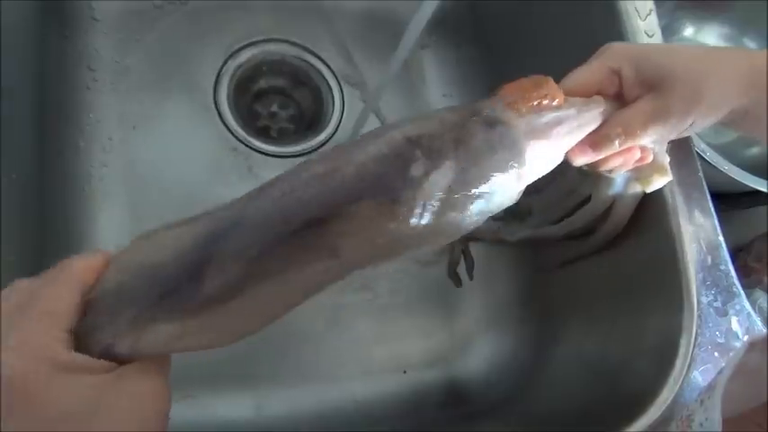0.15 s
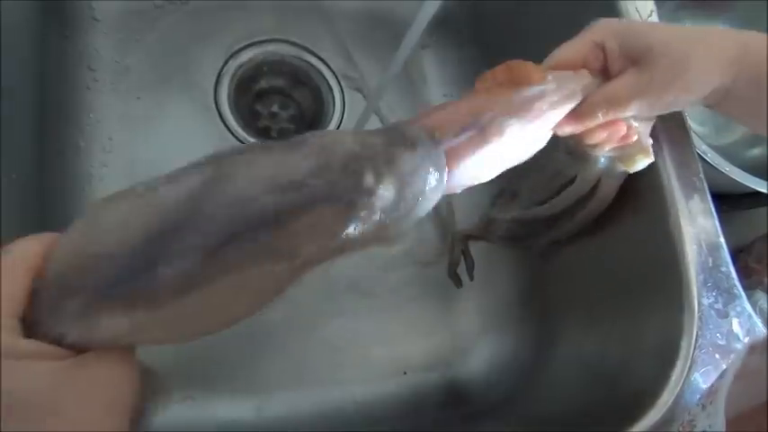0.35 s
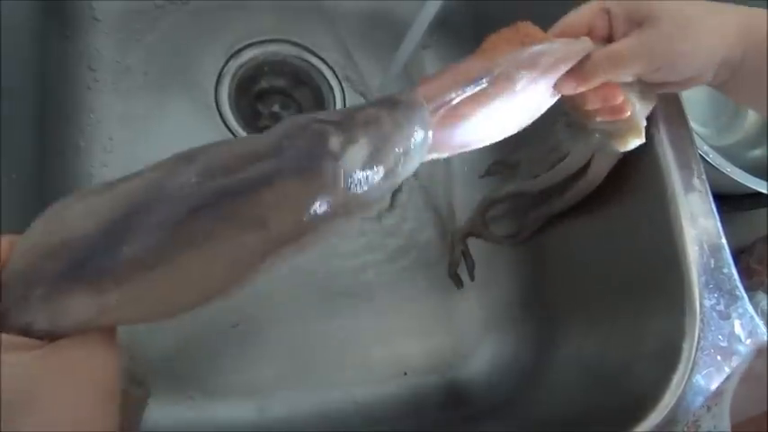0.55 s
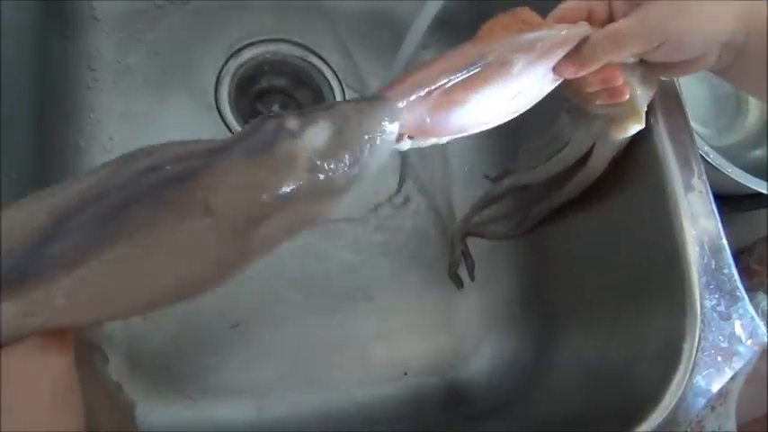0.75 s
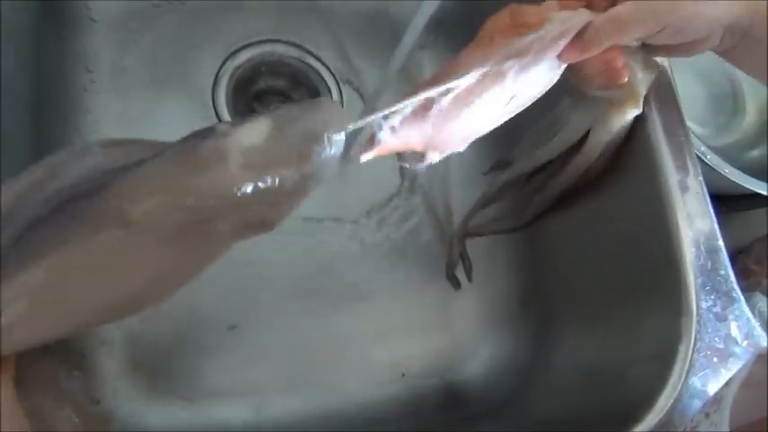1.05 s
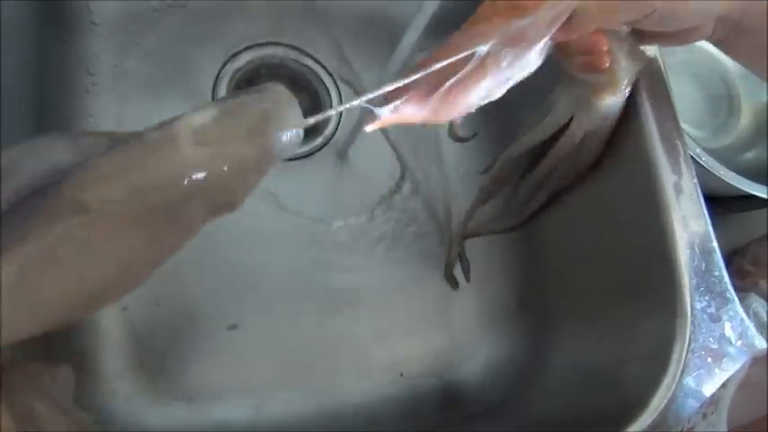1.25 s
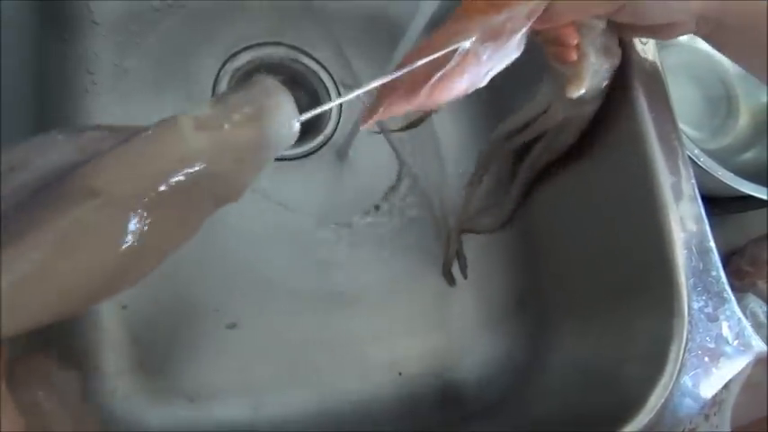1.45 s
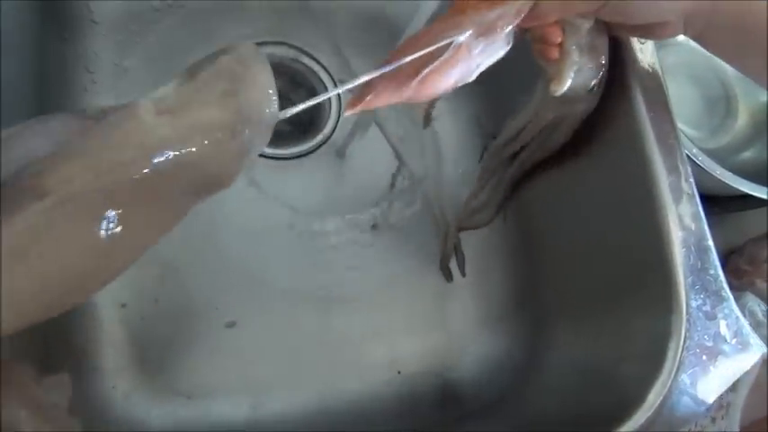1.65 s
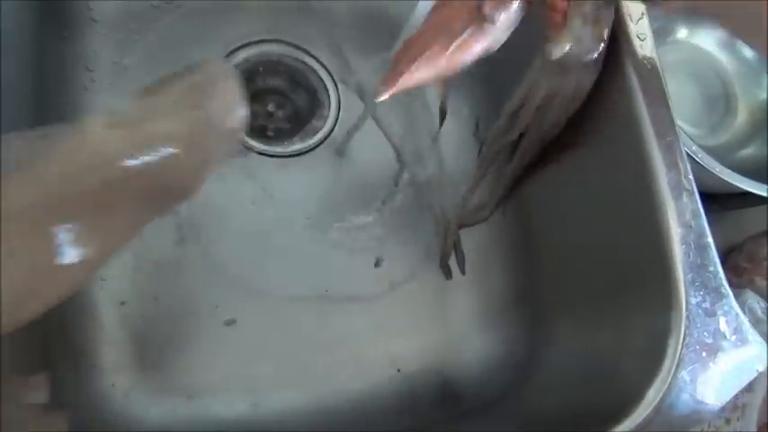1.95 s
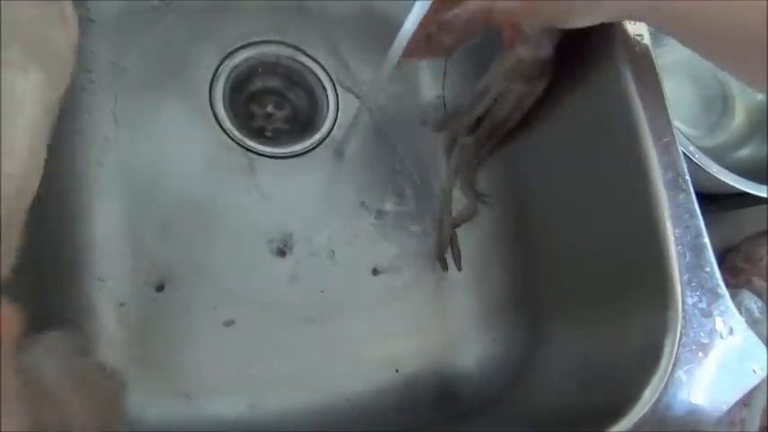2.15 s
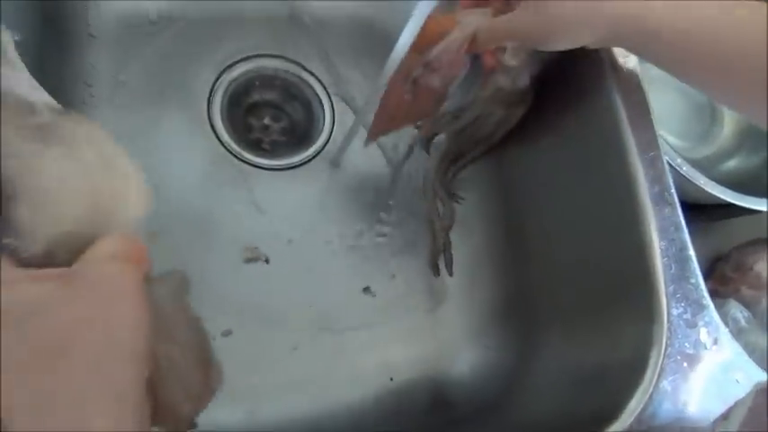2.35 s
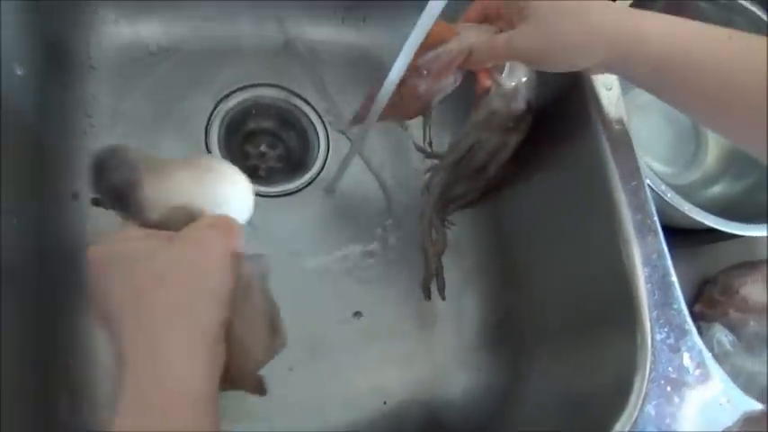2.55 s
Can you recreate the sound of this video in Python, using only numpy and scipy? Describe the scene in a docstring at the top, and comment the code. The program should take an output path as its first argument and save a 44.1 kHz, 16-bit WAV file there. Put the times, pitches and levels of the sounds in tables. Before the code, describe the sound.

Running tap water patters into a metal basin with crisp spatter, small bubbling plops and faint drumming

```python
"""A thin tap stream falls into a steel sink, heard from close above, with bright spatter over a fine hiss.
Spatter and bubbles are damped sines; the bubbles' pitch leaps upward. The hiss is shaped noise.
The floor drums faintly, a little to the left, as noise in its low modes; a few soft gurgles join it.
Basin walls and resonances colour the water; soft overload, a band limit and a stereo width by frequency follow."""
import sys
import numpy as np
from scipy import signal
from scipy.fft import rfft, irfft, next_fast_len
from scipy.io import wavfile
from scipy.ndimage import map_coordinates

SR = 44100
rng = np.random.default_rng(int(sys.argv[2]) if len(sys.argv) > 2 else 0)


def voltage_ratio(decibels):
    """Convert decibels (scalar or array-like) to amplitude ratios, 20 dB per decade."""
    exponent = np.asarray(decibels, float) / 20
    return 10 ** exponent


def wav_record(signal):
    """Record a signal, one row per channel, as 16-bit PCM in the file named by sys.argv[1]."""
    frames = np.transpose(np.atleast_2d(signal))
    bounded = np.clip(frames, -1, 1)
    # unit amplitude maps onto the largest positive 16-bit level
    quanta = np.round(bounded * 32767).astype(np.int16)
    wavfile.write(sys.argv[1], SR, quanta)


N = 119070  # samples, 2.7 s


def unit(x):
    """Normalisation: scale to rms 1."""
    return x / np.sqrt(np.mean(x ** 2) + 1e-20)


def along(points, hz):
    """Spectral envelope: interpolate (Hz, value) points on a logarithmic frequency axis."""
    point_hz, value = np.transpose(points)
    return np.interp(np.log(hz + 1), np.log(point_hz + 1), value)


def curves(rows):
    """Temporal envelopes: one value per sample for each column after the time."""
    s, *columns = np.transpose(rows)
    return [np.interp(np.arange(N) / SR, s, column) for column in columns]


def wobble(rate):
    """Random modulation: a smooth curve through `rate` random knots a second, 400 at most."""
    knots = rng.standard_normal(N // 100 + 4)
    return map_coordinates(knots, [np.arange(N) * min(rate, 400) / SR])


def filtered(x, response):
    """Linear filtering: multiply the spectrum by a complex response of frequency."""
    m = next_fast_len(N + 8192)  # room for the tail
    return irfft(rfft(x, m) * response(np.fft.rfftfreq(m, 1 / SR)), m)[..., :N]


def resonances(table, f):
    """Modal superposition: a causal sum of second-order resonators, rows of (Hz, width Hz, dB)."""
    return sum(voltage_ratio(db) * 1j * f * w / (c * c - f * f + 1j * f * w) for c, w, db in table)


def noise(spectrum, side_db, lean):
    """Partly coherent stereo noise of rms 1: a middle that may lean left and a weak unrelated side."""
    mid, side = filtered(rng.standard_normal((2, N)), spectrum)
    side = voltage_ratio(side_db) * side + lean * mid
    return unit(np.array([mid + side, mid - side]))


def drops(s, db, hz, cycles, rise, width):
    """Damped oscillation: softly starting sines, hz at their peak, climb by rise x hz over a life."""
    u = np.arange(320) / SR * (hz / cycles)[:, None]  # time in lives
    phase = 2 * np.pi * cycles[:, None] * (u + rise * (u ** 2 / 2 - u / 3))
    alive = np.clip(5 - 10 * hz[:, None] * (1 + rise * u) / SR, 0, 1)  # fades before half the sample rate
    envelope = np.e * 3 * u * np.exp(-3 * u)  # peaks at 1 after a third of a life
    grain = voltage_ratio(db)[:, None] * envelope * np.sin(phase) * alive
    at = (np.round(s * SR).astype(int)[:, None] + np.arange(u.shape[1])).ravel()
    pan = width * rng.standard_normal(len(s))[:, None]
    return np.array([np.bincount(at, (grain * (1 + k * pan)).ravel(), N + SR)[:N] for k in (1, -1)])


def swarm(count, hz, spread, cycles, rise, size_db, clump_db, clump_rate, width):
    """Statistical superposition: random drops of joint rms 1, scattered in size and coming in clumps."""
    s = rng.uniform(size=count)  # as a share of the scene
    pitch_z, cycles_z, size_z = np.clip(rng.standard_normal((3, count)), -2.5, 1.7)
    clump = clump_db * np.clip(wobble(clump_rate), -3, 1.3)[(s * N).astype(int)]
    pitch_hz = np.clip(hz * np.exp(spread * pitch_z), 300, SR / 2.5)
    cycles = cycles * np.exp(0.323 * cycles_z)
    return unit(drops(s * N / SR, size_db * size_z + clump, pitch_hz, cycles, rise, width))


# the stream: start_s [s], spatter level_db [dB], level_db of the top treble over it [dB]
STREAM = [(0.05, -30.5, -0.5), (0.07, -30, -7), (0.3, -26.5, -10), (1.23, -28, -8), (1.73, -26.5, -11.5),
          (1.75, -32.5, -2), (1.77, -26.5, -11), (1.8, -27.5, -27), (1.82, -29.5, -13), (2.68, -28, -6.5),
          (2.7, -36, -10)]


def stream_levels():
    """Intensity envelope of the stream: levels of the spatter and of the top treble over it, in dB."""
    return curves(STREAM)


# bubbling in clusters with lulls between: start_s [s], level_db [dB]
BUBBLE_CLUSTERS = [(0.05, -34.5), (0.11, -38.5), (0.14, -36.5), (0.45, -41), (0.55, -31), (0.56, -42.5),
                   (0.71, -36), (0.73, -36.5), (0.88, -38), (0.9, -32), (0.92, -33.5), (0.95, -33.5),
                   (0.96, -44), (0.99, -30), (1.03, -36.5), (1.05, -48), (1.06, -38), (1.08, -40),
                   (1.4, -34), (1.54, -41), (1.55, -29), (1.6, -37.5), (1.63, -29.5), (1.68, -40.5),
                   (2.06, -39), (2.11, -36.5), (2.125, -50), (2.16, -55), (2.17, -39.5), (2.67, -39),
                   (2.7, -44)]


def bubbling_level():
    """Intensity envelope of the bubbling, in dB."""
    return curves(BUBBLE_CLUSTERS)[0]


def surges():
    """Superposed fluctuations: level swings in dB at a slow, a middle and a fast rate."""
    return 0.09 * wobble(11.37) + 0.64 * wobble(60) + 1.75 * wobble(300)


# relative spectrum of the fine hiss: frequency_hz [Hz], level_db [dB per Hz]
HISS_SPECTRUM = [(410, -79), (700, -21), (1370, -16), (1500, -11.5), (2670, -18.5), (3690, -9), (4040, -12),
                 (4540, -17.5), (6620, -3), (7540, 0.5), (9280, 1), (15600, -10.5)]


def fine_hiss(spatter_db, bubble_db, surge_db):
    """Broadband noise in two bands: the upper follows the spatter, the lower partly the bubbling."""
    split_hz = 5500
    follows = 0.65  # share of the bubbling's swing in dB
    hiss = noise(lambda f: voltage_ratio(along(HISS_SPECTRUM, f)), side_db=-21, lean=0)
    low = filtered(hiss, lambda f: 1 / (1 + (f / split_hz) ** 6))
    low_db = follows * (bubble_db - bubble_db.mean()) - 36
    return voltage_ratio(surge_db) * (voltage_ratio(spatter_db - 9.5) * (hiss - low) + voltage_ratio(low_db) * low)


def clicks(level_db):
    """Impulsive radiation: heavily damped bright drops last under two cycles a life on average."""
    return voltage_ratio(level_db - 6.5) * swarm(
        count=900, hz=10370, spread=0.23, cycles=1.84, rise=0.056,
        size_db=2.5, clump_db=1.5, clump_rate=120, width=0.075)


def spatter(level_db):
    """Superposed damped oscillations: many bright drops of widely scattered size."""
    return voltage_ratio(level_db - 6.5) * swarm(
        count=2600, hz=8400, spread=0.17, cycles=4.9, rise=0.22,
        size_db=4.5, clump_db=1.5, clump_rate=180, width=0.091)


def mist(level_db):
    """Dense superposition: the highest drops nearly merge into noise."""
    return voltage_ratio(level_db + 0.5) * swarm(
        count=4000, hz=12110, spread=0.15, cycles=4.6, rise=0.1,
        size_db=4, clump_db=2, clump_rate=150, width=0.2)


def crackle(level_db):
    """Clustered transients: mid-pitched rising drops in strong clumps."""
    return voltage_ratio(level_db - 5) * swarm(
        count=1200, hz=4850, spread=0.221, cycles=5.35, rise=0.4,
        size_db=3, clump_db=3, clump_rate=80, width=0.073)


def bubbles(level_db):
    """Bubble oscillation: damped sines whose pitch climbs strongly as they die away."""
    return voltage_ratio(level_db - 9) * swarm(
        count=700, hz=3200, spread=0.162, cycles=6.3, rise=0.66,
        size_db=5, clump_db=0, clump_rate=40, width=0.1)


# low modes of the steel floor: frequency_hz [Hz], width_hz [Hz], relative level_db [dB]
STEEL_MODES = [(102.1, 3.4, 3.5), (119.1, 2.4, 8), (139, 6.2, -1), (193.7, 7.9, 0), (263, 10.5, -2.5),
               (297.7, 14, -4), (325.6, 3.7, 0.5), (409, 40, -5.5), (496, 8.7, -9), (695, 14.6, -11.5)]


def steel_ring():
    """Modal response: noise keeps the plate's low resonances murmuring."""
    return noise(lambda f: resonances(STEEL_MODES, f), side_db=-19, lean=0.21)


# relative spectrum of the low rush: frequency_hz [Hz], level_db [dB per Hz]
RUSH_SPECTRUM = [(25, -30), (50, -9), (80, -2.5), (110, -3.5), (300, 0), (500, -7), (900, -24), (1400, -21),
                 (3000, -47)]


def low_rush():
    """Broadband flow noise: shaped low noise under the ringing."""
    return noise(lambda f: voltage_ratio(along(RUSH_SPECTRUM, f)), side_db=-17, lean=0.14)


# drumming of the basin floor: start_s [s], level_db [dB]
FLOOR_DRUM = [(0.05, -52.5), (0.11, -51), (0.23, -57), (0.28, -50.5), (0.33, -50), (0.36, -57),
              (0.4, -49.5), (0.73, -56), (0.82, -51), (1.01, -55), (1.68, -52.5), (1.72, -56), (1.75, -50),
              (1.81, -59.5), (2.02, -53.5), (2.52, -55), (2.63, -52), (2.7, -57.5)]


def basin_floor():
    """Forced vibration: the stream keeps the floor sounding, ring and rush under one level."""
    level_db = curves(FLOOR_DRUM)[0] + 0.22 * wobble(15.07)
    return voltage_ratio(level_db) * (voltage_ratio(-1) * steel_ring() + voltage_ratio(-4.5) * low_rush())


# the sharpest spatter ticks: start_s [s], relative peak level_db [dB], pitch_hz [Hz]
SHARP_TICKS = [(0.074, -5.5, 7400), (0.097, -5, 9200), (0.126, -6, 7670), (0.1373, -5, 8400),
               (0.199, -3, 8000), (0.2914, -2.5, 8300), (0.334, -4, 9300), (0.341, -6, 7800),
               (0.44, -2, 9700), (0.4744, -8, 9430), (0.5216, -1, 9800), (0.56, -3, 8000),
               (0.705, -2.5, 8100), (0.837, 3, 8540), (0.8993, -7.5, 4170), (1.0033, -1, 7560),
               (1.0296, -15, 7640), (1.0585, -5, 7700), (1.09, -5, 7540), (1.1503, -5, 8900),
               (1.361, -3, 7740), (1.4646, -6, 9400), (1.4866, 0, 8400), (1.5356, -2, 7250),
               (1.6062, -2, 9300), (1.6433, -9, 3980), (1.7437, 1.5, 9200), (1.8415, -10, 8990),
               (1.9991, -8, 6840), (2.081, -9, 9250), (2.091, -7, 7500), (2.172, -7.5, 7350),
               (2.2144, -12, 9600), (2.279, -12, 4600), (2.2937, -3, 9000), (2.3137, -3, 11500),
               (2.354, -8, 8970), (2.487, -1, 9500), (2.517, -1, 6800), (2.5302, -12, 4230),
               (2.5932, -11, 5200), (2.634, -0.5, 9300)]


def ticks():
    """Short damped oscillation: four cycles a life with hardly any pitch rise."""
    s, db, hz = np.transpose(SHARP_TICKS)
    return drops(s, db - 10, hz, cycles=np.full(len(s), 4.0), rise=0.027, width=0.073)


# the largest bubbles: start_s [s], relative peak level_db [dB], pitch_hz at the peak [Hz]
LARGE_BUBBLES = [(0.138, -23, 3200), (0.1801, -25, 2860), (0.2565, -19.5, 3040), (0.309, -27, 2650),
                 (0.357, -25, 3300), (0.3737, -30, 3200), (0.3962, -25, 2710), (0.4618, -26, 3240),
                 (0.4862, -23, 3250), (0.5302, -22, 2900), (0.5776, -28.5, 2960), (0.6145, -23.5, 3090),
                 (0.7228, -18.5, 3120), (0.7426, -20.5, 2960), (0.766, -22, 2960), (0.776, -26, 2680),
                 (0.8027, -21.5, 2920), (0.8332, -23, 2970), (0.882, -24, 2690), (0.9448, -23, 2800),
                 (0.986, -22, 2500), (1.021, -22, 3200), (1.0563, -24, 3100), (1.1125, -28.5, 2720),
                 (1.258, -31, 2960), (1.287, -25, 3150), (1.3443, -32, 2950), (1.36, -20.5, 3200),
                 (1.385, -27, 2950), (1.4193, -28, 2510), (1.441, -22.5, 3350), (1.472, -23, 3050),
                 (1.488, -26, 2960), (1.533, -38, 3450), (1.5502, -28, 3000), (1.575, -34, 2660),
                 (1.603, -32, 2960), (1.6266, -22, 3090), (1.793, -30.5, 2600), (1.837, -27, 3280),
                 (1.8672, -26, 2920), (1.97, -28.5, 2550), (2.0307, -33, 2700), (2.0772, -29, 2900),
                 (2.1022, -25, 3000), (2.171, -27, 3350), (2.21, -23, 3500), (2.244, -31, 3400),
                 (2.2775, -28, 3250), (2.3072, -24, 2970), (2.403, -29, 2590), (2.5217, -39, 3250),
                 (2.6242, -30, 2540), (2.646, -41, 2740), (2.6604, -27.5, 2550)]


def plops():
    """Rising bubble oscillation: after each large bubble comes a smaller, weaker and higher one."""
    after_s, after_loss_db, after_pitch_ratio = 0.008, 7, 1.15  # middle values, scattered below
    s, db, hz = np.transpose(LARGE_BUBBLES)
    delay_z, loss_z, pitch_z = rng.uniform(-1, 1, (3, len(s)))
    s = np.r_[s, s + after_s * (1 + delay_z / 2)]
    db = np.r_[db, db - after_loss_db * (1 + loss_z / 2)]
    hz = np.r_[hz, hz * after_pitch_ratio ** (1 + pitch_z)]
    cycles = 9.18 * voltage_ratio(0.89 * rng.standard_normal(len(s)))
    return drops(s, db - 3, hz, cycles, rise=0.72, width=0.13)


# soft low gurgles: start_s [s], peak level_db [dB], pitch_hz [Hz]
LOW_GURGLES = [(.265, -48.5, 494), (0.316, -51.5, 228), (1.27, -59, 626), (2.05, -51, 266)]


def gurgles():
    """Damped oscillation at fixed pitch: low sines swell and die, alike on both sides."""
    life_s = 0.046
    total = np.zeros(N)
    for s, db, hz in LOW_GURGLES:
        u = np.clip(np.arange(N) / SR - s, 0, None) / life_s
        total += voltage_ratio(db) * 8 * u * np.exp(-3 * u) * np.sin(2 * np.pi * hz * life_s * u)
    return total


def walls(x):
    """Reverberation: short diffuse decay, with a fresh random tail for each stretch to keep the colour even."""
    t60_s = 0.045
    size = round(t60_s * SR)
    parts = np.pad(x, ((0, 0), (0, -N % size))).reshape(2, -1, size)
    tails = rng.standard_normal(parts.shape) * voltage_ratio(-60 * np.arange(size) / size)
    tails = tails / np.linalg.norm(tails, axis=2, keepdims=True)
    wet = np.pad(signal.fftconvolve(parts, tails, axes=2), ((0, 0), (0, 0), (0, 1)))
    early = wet[..., :size].reshape(2, -1)
    late = np.pad(wet[..., size:].reshape(2, -1), ((0, 0), (size, 0)))  # spills into the next stretch
    return early[:, :N] + late[:, :N]


# resonances of basin and microphone: frequency_hz [Hz], width_hz [Hz], mean level_db over the plain sound [dB]
BASIN_MODES = [(2403, 400, 0.5), (2650, 102, -0.5), (2960, 48, 2.5), (3268, 30, 1), (5410, 500, -6),
               (6133, 65, 1), (7590, 630, -2), (9330, 700, -2), (11460, 370, -6.5)]
# strength of the pool's resonance: start_s [s], mean level_db over the plain sound [dB]
POOL_STRENGTH = [(0.05, 0.5), (0.9, 5), (1.64, 4), (1.7, 2), (2.7, -1)]


def basin_colour(plain):
    """Resonant colouring: each mode, and the pool under the stream, swells and fades as the water moves."""
    waver_db, waver_rate = 2, 12  # knots a second
    pool_hz, pool_width_hz = 4055, 152
    rings = [(mode, 0) for mode in BASIN_MODES]
    rings.append(((pool_hz, pool_width_hz, 0), curves(POOL_STRENGTH)[0]))
    coloured = plain.copy()
    for mode, strength_db in rings:
        swell_db = strength_db + waver_db * wobble(waver_rate)
        coloured += voltage_ratio(swell_db) * filtered(plain, lambda f: resonances([mode], f))
    return coloured


def water():
    """Superposition of hiss and drops, with the basin's reverberation and resonance."""
    smallest_hz, echo_db = 2100, -8  # drops carry little under smallest_hz
    spatter_db, top_db = stream_levels()
    bubble_db = bubbling_level()
    surge_db = surges()
    bright_db = spatter_db + surge_db
    near = clicks(bright_db) + spatter(bright_db) + mist(bright_db + top_db)
    near = near + crackle(bubble_db + surge_db) + bubbles(bubble_db) + ticks() + plops()
    near = filtered(near, lambda f: (1j * f / (1j * f + smallest_hz)) ** 2)
    hiss = fine_hiss(spatter_db, bubble_db, surge_db)
    return basin_colour(hiss + near + voltage_ratio(echo_db) * walls(near))


def scene():
    """Superposition of water, floor and gurgles, from the moment the sound sets in."""
    start_s, onset_s = 0.037, 0.00018
    onset = np.clip((np.arange(N) / SR - start_s) / onset_s, 0, 1)
    return (water() + basin_floor() + gurgles()) * onset


# stereo width by frequency, gain of the left-right difference: frequency_hz [Hz], level_db [dB]
SIDE_GAIN = [(60, 2.5), (300, -2), (600, -14), (4500, -36.5), (6000, -7.5), (10500, -5), (12000, -25)]


def overload_and_band(sound):
    """Saturation, band limiting and frequency-dependent stereo width."""
    ceiling, low_cut_hz, top_hz = 0.29, 36, 15790  # ceiling of the input's soft overload
    left, right = sound / (1 + np.abs(sound / ceiling) ** 3) ** (1 / 3)

    def response(f):
        band = (f < top_hz) * f ** 2 / (f ** 2 + low_cut_hz ** 2)
        return band * voltage_ratio([0 * f, along(SIDE_GAIN, f)])

    mid, side = filtered(np.array([left + right, left - right]) / 2, response)
    return np.array([mid + side, mid - side])


def roll_off(x):
    """The treble ends steeply here."""
    return signal.sosfilt(signal.butter(12, 17020, fs=SR, output="sos"), x)


def record(dry):
    """Signal chain: the scene passes through soft overload, band limit and stereo width."""
    mix = overload_and_band(dry)
    return roll_off(mix)


dry = scene()
out = record(dry)
wav_record(out)
```